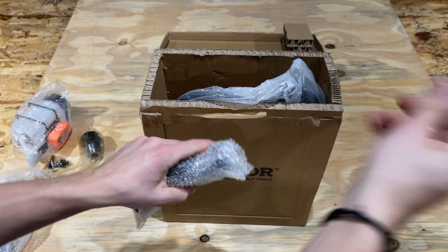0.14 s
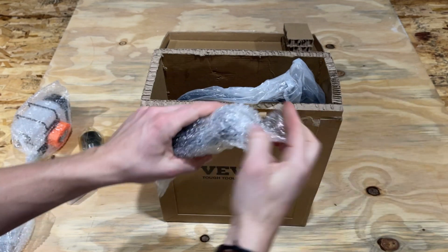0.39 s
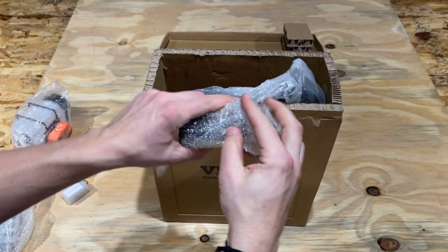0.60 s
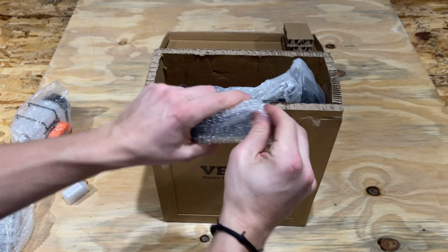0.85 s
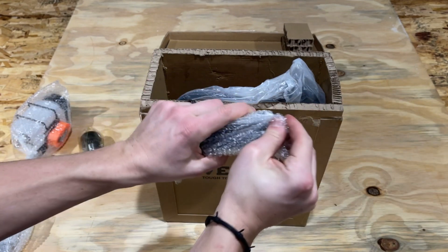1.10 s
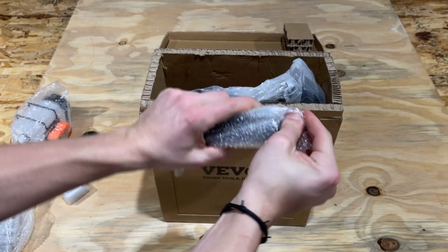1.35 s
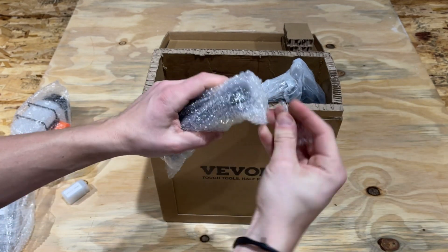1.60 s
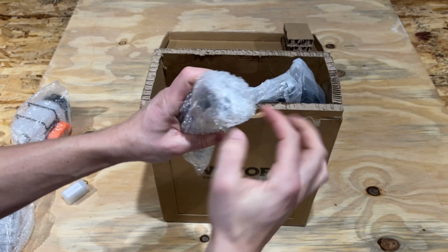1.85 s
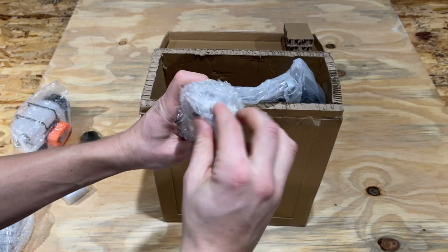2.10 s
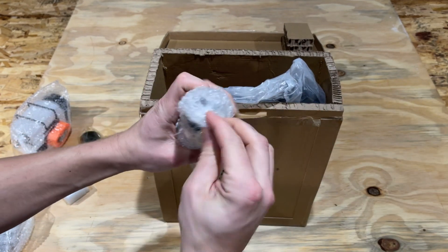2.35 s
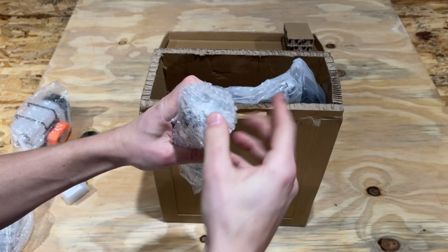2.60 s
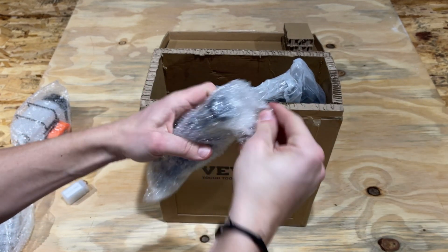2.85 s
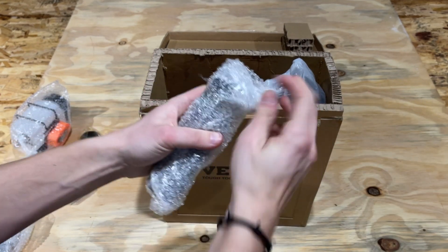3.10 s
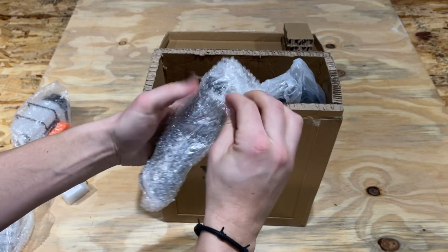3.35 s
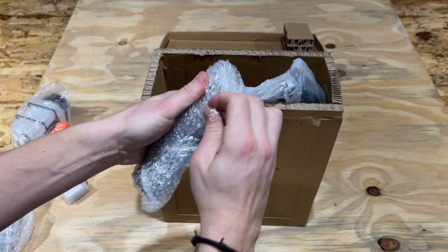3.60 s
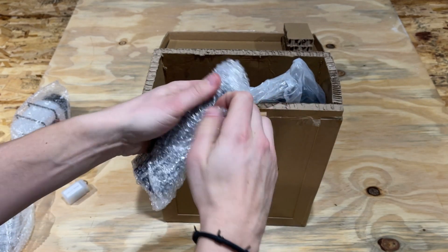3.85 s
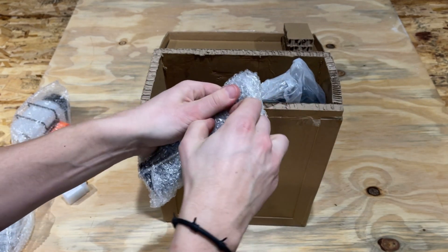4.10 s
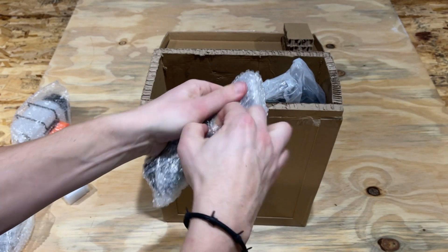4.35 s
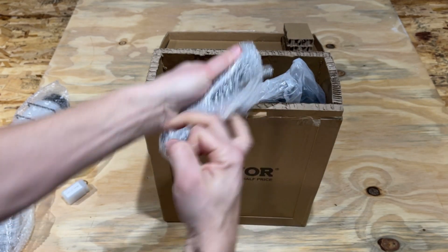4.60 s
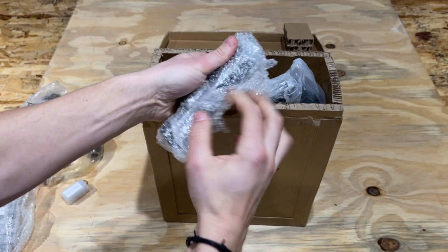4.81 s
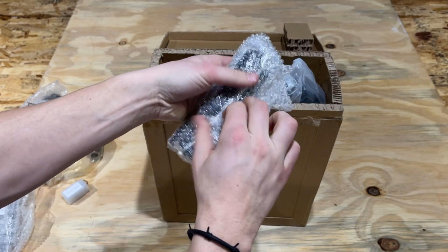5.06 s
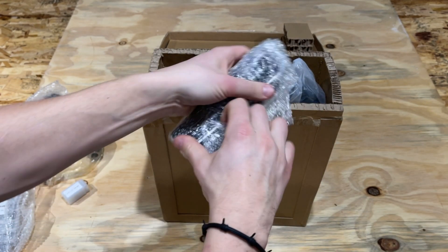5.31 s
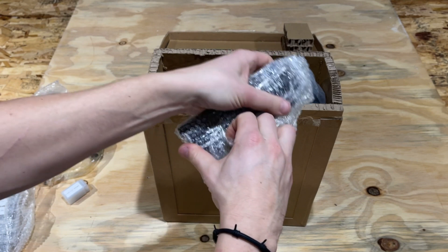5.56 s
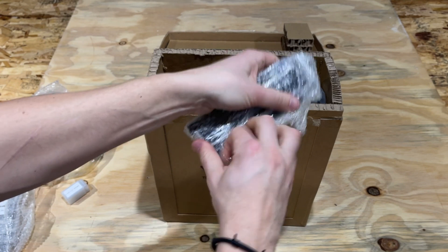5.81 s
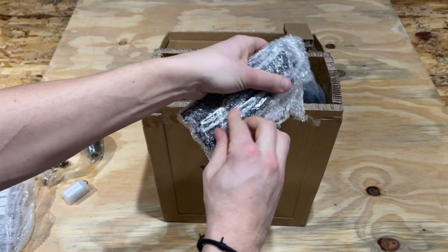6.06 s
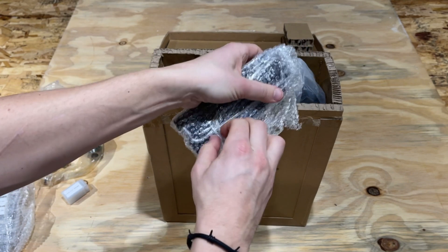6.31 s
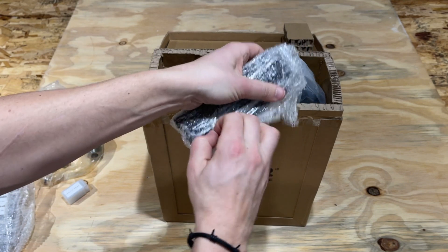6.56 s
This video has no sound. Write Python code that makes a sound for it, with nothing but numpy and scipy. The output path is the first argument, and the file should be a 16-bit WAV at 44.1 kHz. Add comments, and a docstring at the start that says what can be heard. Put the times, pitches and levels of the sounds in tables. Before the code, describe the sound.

Hands work at plastic bubble film and its tape. Irregular crackly rustles swell and fade with near-silent gaps; crisp pops come in clusters around one second and again, loudest, at four and a half. Afterwards the handling turns softer and duller, with scattered ticks and a faint bump. Close microphone, short indoor tail, thin steady air and low hum behind.

```python
"""A dense rustle of tiny clicks with sharp snaps: hands pull and turn bubble wrap and its tape above a table.
Creases of the film buckle as random clicks through resonances; squeezes and peels swell and fade them.
Snaps of folds and tape are damped swings with a tick and after-clicks; two jolts are low swings.
The wooden table returns a quick echo, the workshop a short noise tail; air and a faint machine drone
of narrow-band noise run throughout and are heard in the pauses."""
import sys
import numpy as np
from scipy import signal
from scipy.fft import rfft, irfft
from scipy.io import wavfile

SR = 44100
rng = np.random.default_rng(int(sys.argv[2]) if len(sys.argv) > 2 else 0)


def persist_wave(psi):
    """Save psi, clipped to +-1, as 16-bit WAV."""
    counts = np.round(np.clip(psi, -1, 1) * 32767).astype(np.int16)
    wavfile.write(sys.argv[1], SR, np.atleast_2d(counts).T)


def makeup_ratio(level_db):
    """Linear amplitude ratio for a level in decibels (20 dB per factor of ten)."""
    decades = np.asarray(level_db, float) / 20
    return 10 ** decades


N = 295029

# Crinkle of the gripping hands, rising, falling and nearly stopping in pauses; interpolated.
# Each row: time in seconds, level in dB, brightness in dB before a common lift.
GRIP_CURVE = [(0.0, -62, -5), (0.28, -77, -5), (0.40, -72.5, 4.5), (0.56, -63.5, 5), (0.78, -47, -5),
              (0.91, -50.5, -1.5), (1.03, -56.5, -4.5), (1.25, -61.5, 7), (1.352, -92, 17.5),
              (1.43, -62, 1), (1.71, -67, 0), (2.01, -74, 2.5), (2.2, -69.5, -6), (2.534, -72, -6.5),
              (2.7, -53.5, -2.5), (2.95, -64, -2.5), (3.33, -63, 1.5), (3.5, -61.5, -2.5), (3.9, -60, 0),
              (4.16, -63, -5), (4.43, -50.5, -3), (4.76, -67.5, -2.5), (4.94, -83, 7), (4.98, -60, -2),
              (5.55, -68.5, 2), (5.74, -70, -3), (5.94, -69, 1), (6.1, -64.5, -2.5), (6.69, -68.5, -1)]
# Fingers squeeze the bubbles; the rustle swells and fades.
# Each row: peak time in seconds, peak level in dB, fade in seconds per first 10 dB, brightness in dB before the lift.
SQUEEZE_EVENTS = [(0.104, -49.5, 0.022, -3.5), (0.17, -62.5, 0.043, 10.5), (0.245, -64, 0.025, 10),
                  (0.499, -52, 0.042, -3.5), (0.619, -53.5, 0.033, 2), (1.504, -46, 0.03, -2.5),
                  (1.603, -55.5, 0.032, -3), (2.01, -58.5, 0.021, -0.5), (2.15, -60, 0.095, 3),
                  (2.284, -53, 0.035, -3), (2.39, -63, 0.15, 3), (2.68, -55.5, 0.089, 5.5),
                  (2.77, -57, 0.078, -7), (2.862, -49, 0.079, -1.5), (3.032, -50.5, 0.054, -3.5),
                  (3.235, -50.5, 0.056, -3.5), (3.467, -57, 0.15, -2), (3.54, -54.5, 0.015, -24),
                  (3.633, -57.5, 0.021, 1), (3.78, -55, 0.17, -5.5), (3.856, -63, 0.033, -4),
                  (4.337, -47, 0.049, 1.5), (4.59, -39.5, 0.032, -9), (5.039, -49.5, 0.023, -6),
                  (5.115, -50.5, 0.013, -11), (5.233, -49.5, 0.047, -9), (5.315, -57.5, 0.075, -8),
                  (5.45, -51, 0.02, -4), (5.781, -47.5, 0.056, -8.5), (6.101, -73, 0.13, 1),
                  (6.476, -54, 0.012, -10), (6.537, -49.5, 0.087, -4.5)]
# Tape peels off; the rustle starts at once and runs out.
# Each row: start in seconds, level in dB, fade in seconds per first 10 dB, brightness in dB before the lift.
PEEL_EVENTS = [(1.132, -49.5, .08, -4), (4.202, -54, 0.04, -1), (4.434, -69, 0.03, -5),
               (4.494, -26, 0.082, -8), (4.96, -47, 0.015, -7), (5.602, -49, 0.069, -1)]
# Colour filter of the film's rustle. Each row: frequency in Hz, relative gain in dB.
FILM_COLOUR = [(150, -18), (250, -6), (480, -14.5), (1000, -4.5), (1600, -3), (4300, 0.5), (7000, -4.5),
               (10800, -3.5), (15500, -4.5), (17000, -68)]
# Colour of the room air. Each row: frequency in Hz, relative density in dB.
AIR_COLOUR = [(20, -22), (40, 7), (100, -7.5), (180, -5.5), (260, -10), (470, -15), (1000, -11), (3000, -8),
              (8000, -63), (16000, -47)]
# Drone of a far machine. Each row: resonance in Hz, width in Hz, mean level in dB rms.
DRONE_BANDS = [(97, 30, -76.5), (255, 35, -83), (940, 30, -89), (1055, 10, -84), (1175, 14, -85),
               (1515, 16, -81), (2620, 90, -81)]
# Stereo width of the near sound. Each row: frequency in Hz, side against mid in dB.
SIDE_WIDTH = [(100, -26), (1000, -17.5), (4000, -15), (9000, -13), (14000, -16)]
# Workshop reverberation. Each row: band in Hz, 60 dB decay in seconds, relative level in dB.
ROOM_BANDS = [(304, 0.18, -13.5), (685, 0.35, -20), (2000, 0.32, -18), (5000, 0.27, -19),
              (11100, 0.29, -21.5)]
# Snaps of folds and tape, a few followed by their echo off the table.
# Each row: start in seconds, relative level in dB, pitch in Hz, tick against swing in dB.
SNAP_EVENTS = [(0.028, -46, 5000, 10.5), (0.286, -45.5, 3000, 13), (0.4766, -38, 6840, -21),
               (0.58, -39, 2490, 2), (0.6174, -35, 5100, 3), (0.7833, -14.5, 3870, -4),
               (0.785, -25.5, 3080, 10.5), (0.846, -18.5, 5200, 11), (0.8522, -23, 5260, 13.5),
               (0.868, -27, 5900, 6), (0.885, -13.5, 8800, -20), (0.9098, -23.5, 3950, 8.5),
               (0.9282, -14, 5000, 6), (0.9818, -22.5, 5660, 7.5), (1.0154, -27.5, 2650, 8.5),
               (1.021, -23.5, 4370, -22), (1.1222, -27, 3020, 12), (1.1323, -13.5, 5130, 1.5),
               (1.174, -29, 2140, -12), (1.2135, -11, 5340, -30), (1.267, -30, 5700, 0),
               (1.3954, -29.5, 3670, -38), (1.4854, -18.5, 3450, -30), (2.389, -32, 2920, 3.5),
               (2.686, -38, 6600, 17), (2.7615, -33.5, 3200, -12), (2.838, -35.5, 2000, -22),
               (2.8732, -25, 5800, -30), (2.877, -11, 6300, -34), (3.032, -26, 5200, 4),
               (3.6222, -21.5, 5700, 4.5), (3.9112, -33, 5000, 5.5), (3.9854, -35.5, 2650, -27),
               (4.2, -26.5, 1870, 2.5), (4.2023, -24.5, 3660, -27), (4.249, -27.5, 6000, -26),
               (4.3262, -15, 6600, 1), (4.3403, -26, 6300, -3), (4.357, -25.5, 3400, 4),
               (4.4318, -13.5, 3250, -39), (4.489, -5.5, 2940, 0), (4.4914, -13.5, 1840, -28),
               (4.4953, -5.5, 5600, -35), (4.501, -28, 3700, -23), (4.5783, -22, 3200, 10.5),
               (4.589, -21, 2560, -18), (4.604, -24, 2280, -15), (4.7975, -38, 3550, -1.5),
               (5.113, -34, 2000, -21), (5.3111, -22.5, 4250, -0.5), (5.384, -35.5, 3540, -25),
               (5.459, -34.5, 2070, 3), (5.5305, -35.5, 5930, 11), (5.602, -21, 4730, 5.5),
               (5.6307, -30, 7000, 9), (5.6459, -28, 8900, 9), (5.7635, -28, 1490, -26),
               (5.7672, -22.5, 2400, -32), (5.7813, -24, 1230, -8), (5.7847, -21.5, 1200, -2),
               (6.098, -41, 4300, 11), (6.2563, -27, 5200, -8), (6.4779, -33, 2100, -23),
               (6.5154, -28.5, 2060, 6), (6.5184, -36.5, 4300, 20), (6.538, -14.5, 5500, -21),
               (6.6892, -29, 3300, 8.5)]
# The wrapped part jolts in the hands. Each row: start in seconds, level in dB before decay, pitch in Hz.
JOLT_EVENTS = [(4.4885, -28, 212), (5.783, -42, 201)]


def rms_one(x):
    """Scale to unit rms."""
    return x / np.sqrt(np.mean(x ** 2) + 1e-20)


def at_hz(points, hz):
    """Read a (Hz, dB) table on a log-frequency axis."""
    table_hz, table_db = np.array(points).T
    return np.interp(np.log(np.maximum(hz, 1)), np.log(table_hz), table_db)


def coloured(x, table):
    """Filter by a (Hz, dB) gain table."""
    size = x.shape[-1]
    hz = np.arange(size // 2 + 1) * SR / size
    return irfft(rfft(x) * makeup_ratio(at_hz(table, hz)), size)


def butter2(x, hz, kind):
    """Filter with a Butterworth design of order 2."""
    return signal.sosfilt(signal.butter(2, hz, kind, fs=SR, output="sos"), x)


def drift(knots_per_s):
    """Slow random wander between normal knots of unit spread."""
    knots = rng.standard_normal(N // 400)
    return np.interp(np.arange(N) / SR * knots_per_s, np.arange(len(knots)), knots)


def resonance(x, hz, width_hz):
    """Two-pole band-pass with gain near 1 on top."""
    r = np.exp(-np.pi * width_hz / SR)
    b = np.array([1, 0, -1]) * (1 - r * r) / 2
    a = [1, -2 * r * np.cos(2 * np.pi * hz / SR), r * r]
    return signal.lfilter(b, a, x)


def handling(fade_db=10, swell_share=1, squeeze_curve=1.62, peel_start_s=0.0021, peel_curve=1.57):
    """Grip, squeezes and peels add in power; brightness in dB is their power-weighted mean."""
    t = np.arange(0, N + 32, 32) / SR
    s, grip_db, grip_bright_db = np.transpose(GRIP_CURVE)
    power = makeup_ratio(2 * np.interp(t, s, grip_db))
    weighted_bright = power * np.interp(t, s, grip_bright_db)
    # curve: 1 = pointed, 2 = rounded
    moves = [(row, swell_share * row[2], squeeze_curve) for row in SQUEEZE_EVENTS]
    moves += [(row, peel_start_s, peel_curve) for row in PEEL_EVENTS]
    for (at_s, peak_db, fade_s, bright_db), swell_s, curve in moves:
        away = np.where(t < at_s, (at_s - t) / swell_s, (t - at_s) / fade_s)
        fall_db = np.minimum(fade_db * away ** curve, 150)
        move = makeup_ratio(2 * (peak_db - fall_db))
        power = power + move
        weighted_bright = weighted_bright + move * bright_db
    return t, 10 * np.log10(power), weighted_bright / power


def rustle(median_per_s=2600.0, spread_db=5.3, hiss_db=-6.5, q=1.7, crisp_db=-9.0,
           even_from_db=-62, even_over_db=55):
    """Creases buckle in clumps as short resonant clicks of random size and pitch, over a hiss."""
    s, level_db, bright_db = handling()
    t = np.arange(N) / SR
    level_db = np.interp(t, s, level_db)
    born = rng.random(N) < median_per_s * makeup_ratio(4.5 * drift(80.0)) / SR
    # stronger handling evens out the crease sizes
    evening = np.clip(1 - (level_db - even_from_db) / even_over_db, .4, 1)
    size_db = spread_db * evening * np.minimum(rng.exponential(1, N), 4.0)
    impulses = makeup_ratio(size_db) * rng.choice([-1, 1], N) * born
    pitches_hz = np.geomspace(500, 13000, 10)
    dealt = rng.integers(0, 11, N)
    clicks = makeup_ratio(crisp_db) * impulses * (dealt == 10)   # crispest creases cover every pitch
    for k, hz in enumerate(pitches_hz):
        ringing = resonance(impulses * (dealt == k) + 1e-18, hz, hz / q)
        clicks = clicks + ringing * np.sqrt(9000 / hz)
    film = rms_one(clicks) + makeup_ratio(hiss_db) * rng.standard_normal(N)   # hiss of sliding skin and film
    film = rms_one(coloured(film, FILM_COLOUR))
    bright = butter2(film, 4500, "high")
    deep = butter2(film, 1400, "low")
    tilt_db = np.interp(t, s, bright_db) + 4
    # broad folds are duller and fuller than tight creases
    film = film + bright * (makeup_ratio(tilt_db) - 1) + deep * (makeup_ratio(-.6 * tilt_db) - 1)
    return film * makeup_ratio(level_db + 1.8 * drift(45.0))


def room_tone(air_db=-71):
    """Steady coloured air noise plus a drone: noise in narrow resonances, slowly wavering."""
    tone = makeup_ratio(air_db) * rms_one(coloured(rng.standard_normal(N), AIR_COLOUR))
    for hz, width_hz, level_db in DRONE_BANDS:
        hum = rms_one(resonance(rng.standard_normal(N), hz, width_hz))
        tone = tone + hum * makeup_ratio(level_db + 1.5 * drift(3.0))
    return tone


def port_difference(near):
    """The two ports differ by a weak copy, smeared in time by all-pass stages."""
    side = near
    for lag in (7, 19, 43):   # samples
        taps = np.r_[1, np.zeros(lag - 1), .6]
        side = signal.lfilter(taps[::-1], taps, side)
    return coloured(side, SIDE_WIDTH)


def workshop(x):
    """Diffuse tail: noise dying band by band, different on each side, fading in over 10 ms."""
    t = np.arange(SR // 2) / SR
    tail = 0
    for hz, t60_s, level_db in ROOM_BANDS:
        noise = rng.standard_normal((2, len(t)))
        band = butter2(noise, [hz / 1.355, min(hz * 1.585, .45 * SR)], "band")
        tail = tail + band * makeup_ratio(level_db - 60 * t / t60_s)
    tail = tail * np.clip(t / .01, 0, 1) * .07
    shared, apart = tail[0], tail[1] * makeup_ratio(-2.5)
    sides = np.array([shared + apart, shared - apart])
    return signal.fftconvolve(x[None], sides, axes=1)[:, :N]


def table_echo(x, delay_s=.0028, level_db=-18):
    """The wooden table returns one delayed, weaker copy."""
    lag = int(delay_s * SR)
    return makeup_ratio(level_db) * np.concatenate([np.zeros(lag), x[:-lag]])


def snaps(tick_s=.00009, crackle_db=-10.5, crackle_s=0.0028, thin=0.16):
    """Each snap or its echo: a heavily damped swing, a sharp tick, after-clicks as the crease settles."""
    out, t = np.zeros(N + 900), np.arange(900) / SR
    chance = rng.random((len(SNAP_EVENTS), 901))
    for (s, level_db, hz, sharp_db), draw in zip(SNAP_EVENTS, chance):
        swing = np.sin(2 * np.pi * hz * t) * np.exp(-t * hz / .65) * (1 - np.exp(-t * hz / .2))
        tick = np.sin(2 * np.pi * 10000 * t) * np.exp(-t / tick_s)
        click = swing / swing.max() + makeup_ratio(sharp_db) * tick
        # the ninth power leaves few strong after-clicks
        after = (2 * draw[1:] - 1) ** 9 * np.exp(-t / crackle_s) * makeup_ratio(crackle_db)
        sound = click + np.convolve(after, click[:60])[:900]
        # a small fold radiates little below its own pitch
        sound = butter2(sound, thin * hz, "high")
        at = int(round(s * SR))
        out[at:at + 900] += np.sign(draw[0] - .5) * makeup_ratio(level_db - 2.5) * sound
    return out[:N]


def jolts(decay_cycles=0.57):
    """A low, soft push: a sine that decays within about one swing."""
    t = np.arange(N) / SR
    out = np.zeros(N)
    for s, level_db, hz in JOLT_EVENTS:
        swing = np.sin(2 * np.pi * hz * np.maximum(t - s, 0))
        out += makeup_ratio(level_db) * swing * np.exp(-np.abs(t - s) * hz / decay_cycles)
    return out


def scene():
    """Film, snaps and jolts with the table echo, nearly centred; the room's tail and air are wider."""
    near = rustle() + snaps() + jolts()
    near = near + table_echo(near)
    side = port_difference(near) + makeup_ratio(-13.0) * room_tone()
    mid = near + room_tone()
    return mid + side * np.array([[1], [-1]]) + workshop(near)


def band_limit(x):
    """A steep low-pass at the top of the band."""
    return signal.sosfilt(signal.butter(12, 16680, fs=SR, output="sos"), x)


def record(dry):
    """The microphone drops the deepest bass and softens the very top."""
    mix = butter2(dry, 90, "high")
    mix = butter2(mix, 14000, "low")
    return band_limit(mix)


dry = scene()
out = record(dry)
persist_wave(out)
```